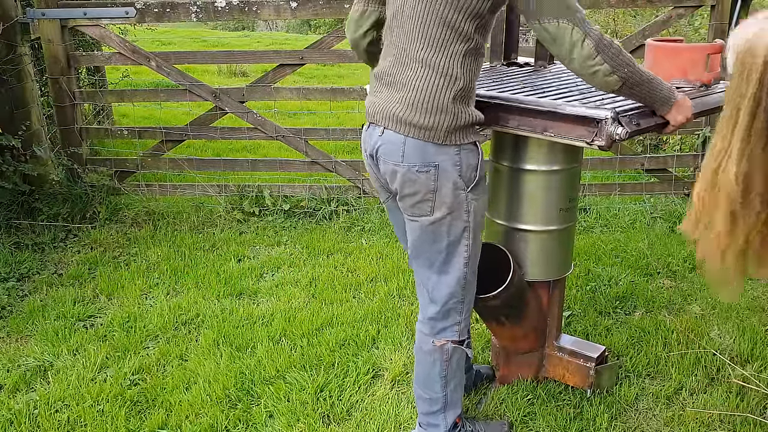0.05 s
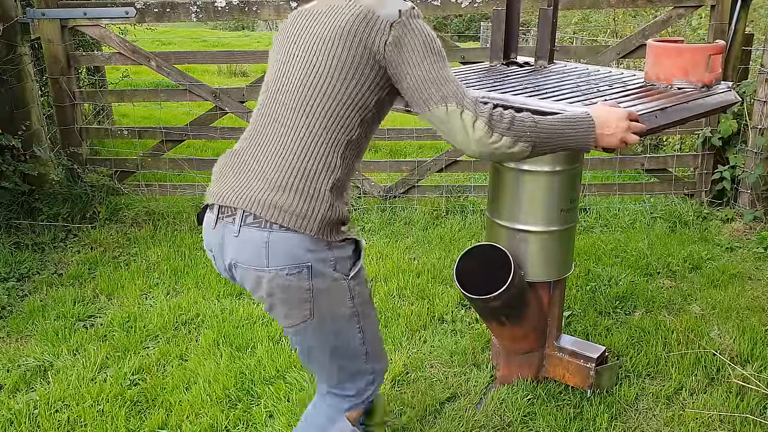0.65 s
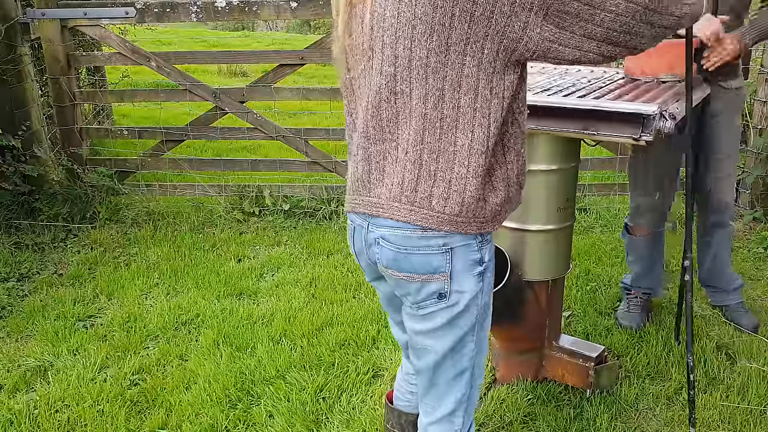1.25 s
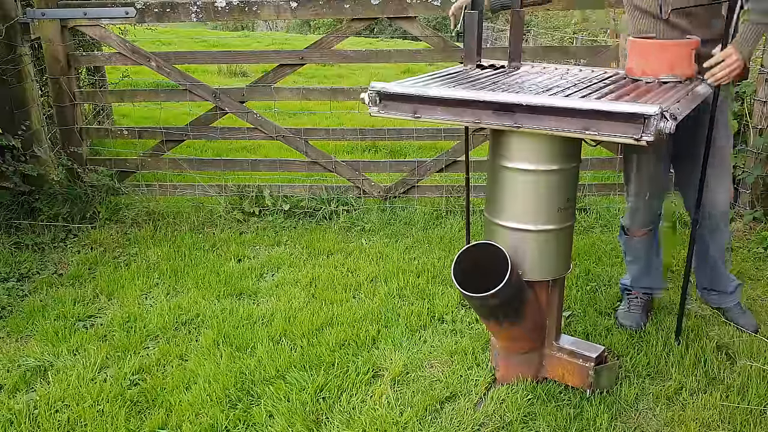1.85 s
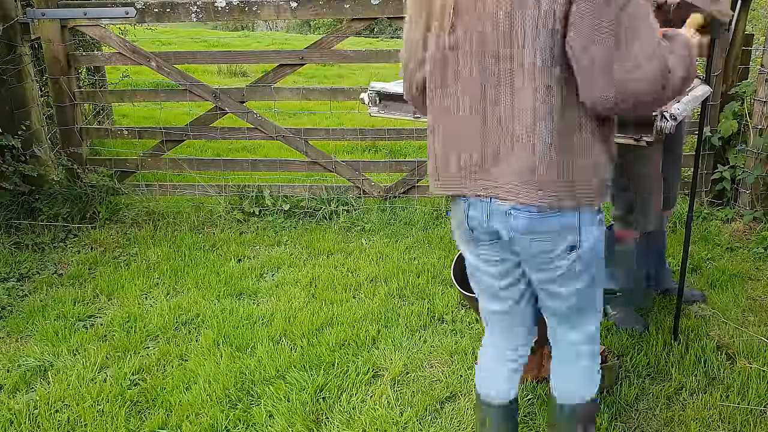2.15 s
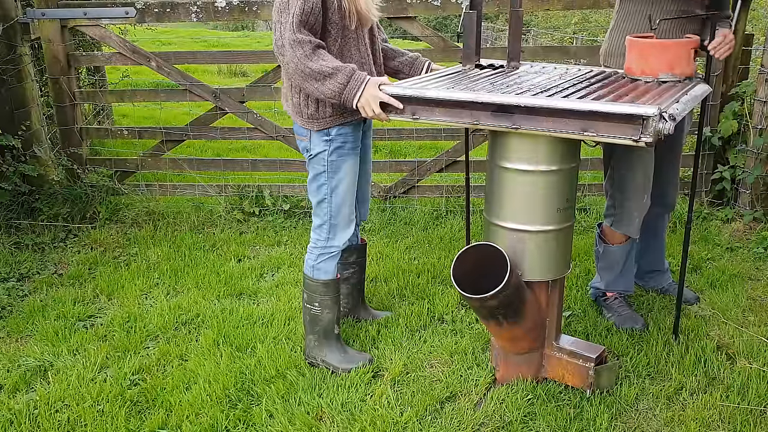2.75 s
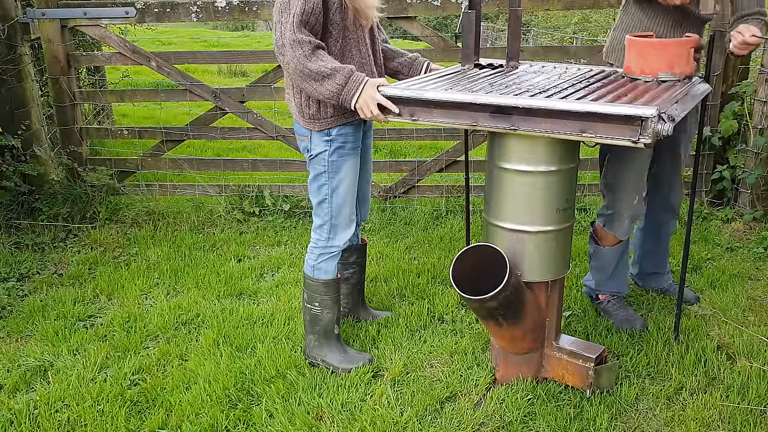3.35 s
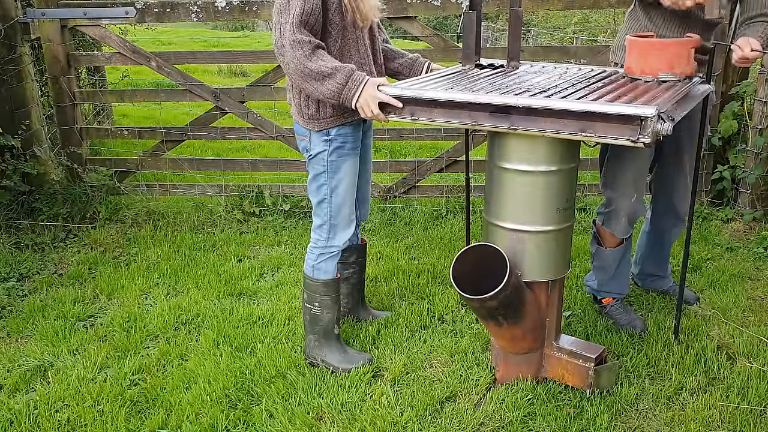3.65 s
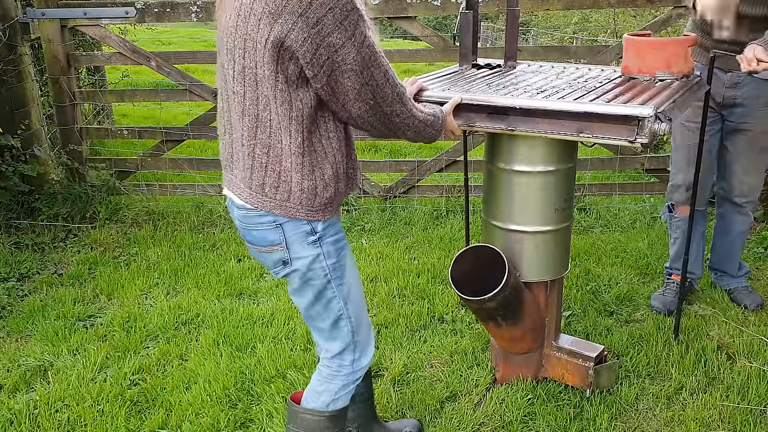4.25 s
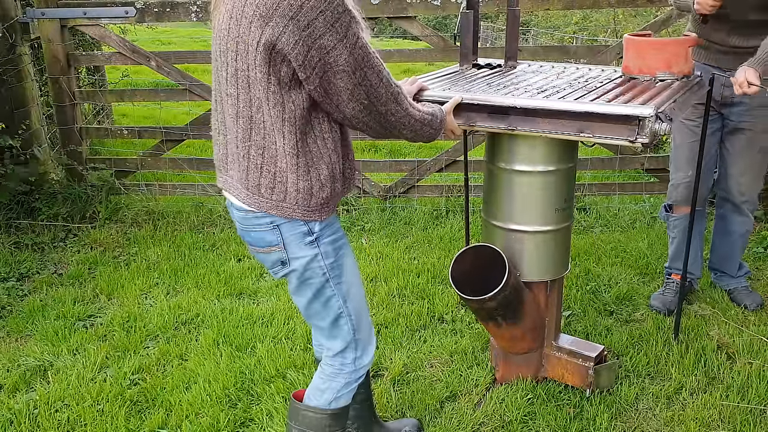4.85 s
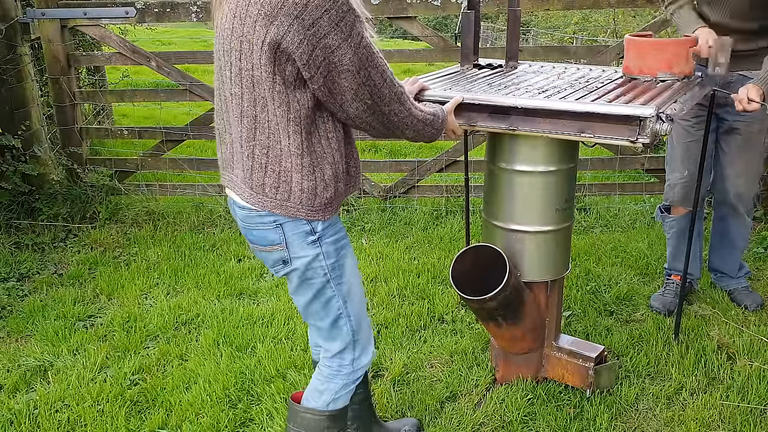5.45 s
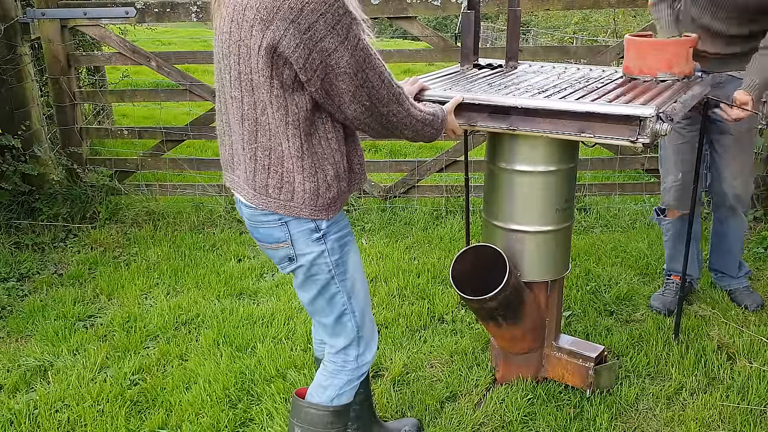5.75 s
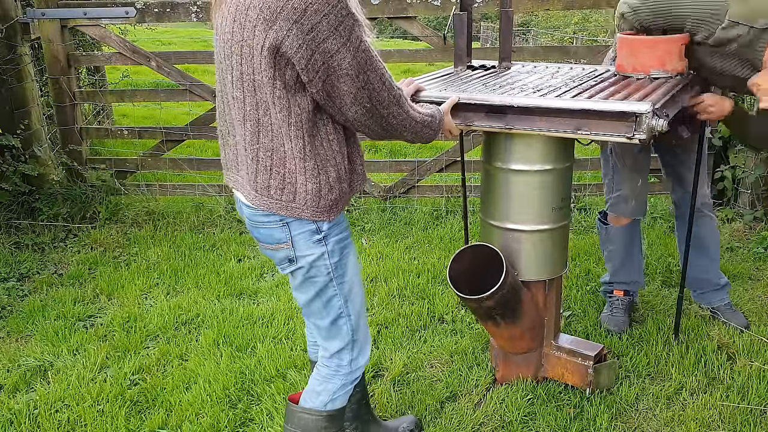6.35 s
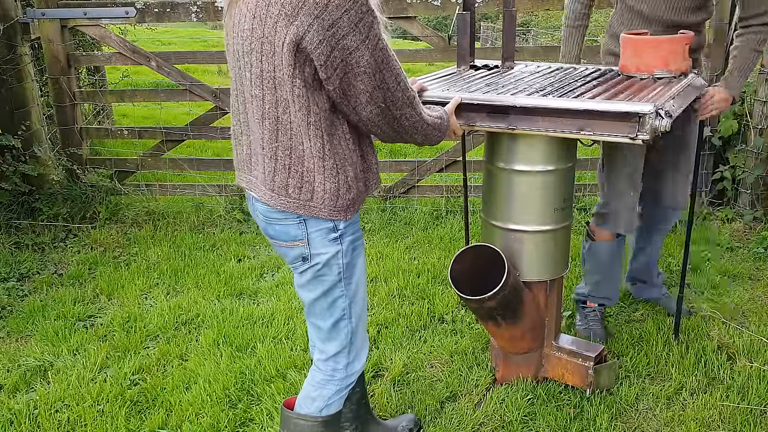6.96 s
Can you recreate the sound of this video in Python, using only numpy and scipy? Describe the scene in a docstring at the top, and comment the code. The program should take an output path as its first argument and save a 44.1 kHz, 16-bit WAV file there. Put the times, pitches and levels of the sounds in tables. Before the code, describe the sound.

A mallet taps a steel rod in fast, sped-up bursts close by, among light metal knocks and quiet outdoor air.

```python
"""On a lawn, two people fit a heavy steel griddle top and its rod onto the flue pipe of a stove.
Close by, left of the microphone, come four runs of quick, dry, sped-up mallet blows on the steel rod,
about twenty a second, each with a soft low thump; light taps and dull knocks fall around them.
Behind lie outdoor hiss, a low rumble and a faint hum, with dips where the recorder's gain ducks."""
import sys
import numpy as np
from scipy import signal
from scipy.fft import rfft, irfft
from scipy.io import wavfile

SR = 44100
rng = np.random.default_rng(int(sys.argv[2]) if len(sys.argv) > 2 else 0)


def unload_wav(signal):
    """Save mono or channel-first audio to the path in sys.argv[1] as 16-bit WAV at rate SR, clipped to [-1, 1]."""
    wavfile.write(
        sys.argv[1],
        SR,
        np.round(np.clip(np.atleast_2d(signal).T, -1, 1) * 32767).astype(np.int16),
    )


N = 312669
TIME = np.arange(N) / SR


def undb(db):
    """Decibels to gain."""
    return 10 ** (np.asarray(db) / 20)


def unit(x):
    """Scale to rms 1."""
    return x / np.sqrt(np.mean(x ** 2) + 1e-30)


def curve(table, column):
    """One column of a table, joined by straight lines in time."""
    rows = np.array(table)
    return np.interp(TIME, rows[:, 0], rows[:, column])


def colour(points, hz):
    """Gain of a spectrum of (Hz, dB) points."""
    point_hz, db = np.transpose(points)
    return undb(np.interp(np.log(hz + 1), np.log(point_hz), db))


def band(hz, lo, hi, order=8):
    """Gain of a steep band-pass."""
    return 1 / np.sqrt((1 + (lo / (hz + 1)) ** (2 * order)) * (1 + (hz / hi) ** (2 * order)))


def resonance(hz, centre_hz, width_hz):
    """Response of one damped mode, gain 1 at its centre."""
    return 1j * hz * width_hz / (centre_hz ** 2 - hz ** 2 + 1j * hz * width_hz)


def pan(db):
    """Constant-power gains for a left minus right level in dB."""
    gains = undb(np.array([db, -db]).reshape(2, -1) / 2)
    return gains / np.sqrt(np.mean(gains ** 2, axis=0))


def stereo_noise(size, apart):
    """Noise that both sides share, plus a part of their own."""
    noise = rng.standard_normal((3, size))
    return (noise[0] + apart * noise[1:]) / np.sqrt(1 + apart ** 2)


def drift(rate_hz):
    """A random wander at rms 1."""
    knots = rng.standard_normal(1024)
    return unit(np.interp(TIME * rate_hz, np.arange(len(knots)), knots))


def add(out, start_s, sound):
    """Mix a sound in at a given time."""
    i = int(round(start_s * SR))
    out[:, i:i + sound.shape[1]] += sound[:, :N - i]


# The background, with dips written in where the recorder's gain control turns it down after loud ticks.
# Each row: time in seconds, then levels of hiss, rush and rumble in dB.
BACKGROUND_LEVELS = [(0, -59, -58, -49), (0.12, -58.5, -58.5, -54.5), (0.28, -59.5, -57, -52),
                     (0.45, -56.5, -54.5, -54.5), (0.62, -58, -56.5, -51), (0.78, -58.5, -56, -50),
                     (0.98, -57, -55.5, -45.5), (1.06, -64, -59.5, -55.5), (1.25, -61, -58.5, -55),
                     (1.33, -62, -58.5, -48), (1.55, -64.0, -57.5, -49), (1.72, -59.5, -54.5, -47.5),
                     (1.9, -59, -54.5, -48), (2.05, -58, -57, -52.5), (2.22, -60.5, -57.5, -51),
                     (2.42, -58.5, -53.5, -50), (2.56, -55.5, -50.5, -49), (2.69, -59.5, -65, -50.5),
                     (2.79, -51.5, -51.5, -57), (2.85, -67, -61, -59), (2.91, -65, -64.5, -54),
                     (3.0, -60.5, -54.5, -53), (3.1, -58.5, -54, -47.5), (3.23, -60, -53.5, -54),
                     (3.37, -63, -60.5, -54), (3.47, -53, -56, -54), (3.56, -64, -59, -60),
                     (3.66, -65, -56.5, -49.5), (3.79, -64, -63.5, -53), (3.9, -57.5, -57.5, -53.5),
                     (4.05, -57.5, -57.5, -55.5), (4.2, -61.5, -58, -54.5), (4.38, -63.5, -59.5, -55),
                     (4.53, -65.5, -60, -51.5), (4.68, -62, -61.5, -61), (4.82, -61.5, -60.5, -53),
                     (4.92, -61, -51.5, -39), (5.02, -58.5, -54.5, -46.5), (5.12, -66.5, -61.5, -54.5),
                     (5.28, -65.5, -61, -53.5), (5.42, -68, -66, -61), (5.55, -69, -60, -54),
                     (5.7, -66.5, -66.5, -55.5), (5.79, -68.5, -66, -60), (5.87, -63.5, -61, -57),
                     (5.95, -59, -53, -55), (6.08, -55.5, -50, -51), (6.2, -59.5, -52.5, -50.5),
                     (6.35, -55, -48, -47.5), (6.48, -56, -49, -54), (6.58, -60, -55, -55),
                     (6.8, -58.5, -55, -54.5), (6.97, -59.5, -54.5, -52.5), (7.07, -64, -57, -55)]
# Its colour at the microphone. Each row: frequency in Hz, relative level in dB.
BACKGROUND_COLOUR = [(20, 0), (35, -2), (52, 0.5), (75, -4), (105, -3), (135, -10), (170, -11),
                     (280, -13.5), (600, -20), (1500, -22.5), (3000, -26.5), (5600, -29), (6800, -38),
                     (8000, -49.5), (9200, -59.5), (10200, -76.5)]
# Its lean to the left. Each row: time in seconds, left minus right in dB.
BACKGROUND_PAN = [(0, 6), (1.2, 11), (2, 7), (3.5, 5.5), (5, 5), (6.2, 5.5), (7.09, 6)]


def background(trim_db=-1.0, flicker_db=0.8):
    """Outdoor hiss, a low rush and a rumble of air, each following its level curve."""
    hz = np.arange(N // 2 + 1) * SR / N

    def layer(lo, hi, apart, level_db, flicker_hz):
        """One band of noise, flickering about its level."""
        spectrum = rfft(stereo_noise(N, apart)) * colour(BACKGROUND_COLOUR, hz) * band(hz, lo, hi)
        return unit(irfft(spectrum, N)) * undb(level_db + flicker_db * drift(flicker_hz))

    hiss = layer(1300, 11000, apart=0.71, level_db=curve(BACKGROUND_LEVELS, 1) + trim_db, flicker_hz=25)
    rush = layer(150, 1300, apart=0.93, level_db=curve(BACKGROUND_LEVELS, 2) + trim_db, flicker_hz=18)
    rumble = layer(15, 140, apart=0.99, level_db=curve(BACKGROUND_LEVELS, 3), flicker_hz=16)
    return (hiss + rush + rumble) * pan(curve(BACKGROUND_PAN, 1))


# A hum in the background. Each row: pitch in Hz, base level in dB.
HUM_TONES = [(100, -60), (150, -67.5), (350, -76.5), (500, -70.5), (700, -71.5), (1200, -77)]
# Its level dips and returns. Each row: time in seconds, gain in dB.
HUM_GAIN = [(0, 2), (1, -0.5), (1.1, -3), (1.8, -1), (2.4, -5), (2.9, -11), (4, -5), (5.7, -12.5),
            (6.1, -0.5), (7.09, 0)]


def hum(waver_db=0.1, waver_radians=0.59, pan_db=7):
    """Faint tones off to the left, each wavering a little in level and pitch."""
    tones = np.zeros(N)
    for hz, db in HUM_TONES:
        amplitude = np.sqrt(2) * undb(db - waver_db * drift(2.6))
        tones += amplitude * np.sin(2 * np.pi * hz * TIME + waver_radians * drift(4.1))
    return tones * undb(curve(HUM_GAIN, 1)) * pan(pan_db)


# The short metallic resonances of each tick. Each row: pitch in Hz, width in Hz, relative level in dB.
TICK_MODES = [(330, 130, -10.5), (670, 317, -8), (1130, 380, -7.5), (1670, 200, -8), (2310, 494, -4),
              (3000, 306, 1.5), (3500, 443, -1.5), (4470, 725, -1), (5190, 986, 1), (6900, 1255, -0.5)]
# The loss of treble in a tick. Each row: frequency in Hz, gain in dB.
TICK_ROLLOFF = [(5500, -2), (7300, -8), (8000, -10), (9000, -9.5), (9800, -22), (10800, -52)]
# The body, middle and edge of a tick. Each row: low limit in Hz, high limit in Hz.
TICK_BANDS = [(200, 1500), (1500, 4200), (4200, 10500)]
# Sharp dry strikes and light taps, close to the microphone. Each row: time in seconds, levels of body,
# middle and edge in dB (rms over 10 ms), length in seconds, near scatter in dB, left minus right in dB,
# ping pitch in Hz, ping gain in dB.
TICKS = [(1.0386, -60, -58, -62.5, 0.00081, -12, 1, 4720, 8),
         (1.103, -58.5, -56.5, -64.5, 0.0019, -21, 14, 2020, 8),
         (1.683, -58, -59.5, -65, 0.0011, -15, 5, 2000, 6),
         (1.8257, -47, -53, -45.5, 0.0013, -11, 1, 2140, 18),
         (2.351, -43.5, -46.5, -69, 0.003, -6, 6, 2020, 4.5),
         (2.5068, -35.5, -41.5, -55.5, 0.0015, -2, 9.5, 2220, 10),
         (2.6154, -25.5, -16.5, -30.5, 0.0013, -24, 6.5, 2480, 7),
         (2.6639, -33, -26, -29.5, 0.00071, -24, 6.5, 3880, -1),
         (2.7131, -36.5, -27.5, -28.5, 0.0025, -32, 7.5, 5330, 5),
         (2.7616, -39.5, -29, -35.5, 0.00093, -13, 7, 3200, -8),
         (2.8135, -34, -25.5, -29.5, 0.0015, -23, 6, 3620, 0),
         (2.8677, -40, -31.5, -34, 0.0028, -13, 8, 5060, 7),
         (3.1654, -41, -35.5, -27.5, 0.0025, -19, 9, 5400, 7.5),
         (3.211, -41.5, -31.5, -28.5, 0.0013, -32, 6.5, 4900, 9),
         (3.2556, -37.5, -27.5, -27, 0.0014, -31, 5, 5400, 7.5),
         (3.3019, -38, -33, -28, 0.00084, -19, 5, 5250, 5),
         (3.3472, -41, -32, -33.5, 0.0036, -26, 5, 5250, 7),
         (3.3961, -36.5, -34, -32.5, 0.00099, -17, 3, 1990, 10.5),
         (3.444, -39.5, -36, -32.5, 0.0009, -13.5, 4.5, 5170, 2),
         (3.489, -44, -35, -32, 0.0035, -31, 3.5, 4950, 6),
         (3.5394, -42, -35.5, -32.5, 0.00061, -20, 2, 3830, -2),
         (3.5886, -37.5, -28.5, -27.5, 0.0014, -22, 4.5, 3320, -1.5),
         (3.6376, -43.5, -30.5, -33, 0.0013, -21, 1.5, 3720, 2.5),
         (3.6879, -43.5, -34.5, -29.5, 0.0027, -21, 7, 5670, 7),
         (3.7368, -41.5, -32, -32.5, 0.00077, -14, 3.5, 3960, 7),
         (4.1279, -46.5, -35, -28.5, 0.0025, -29, 6, 4610, 8),
         (4.1737, -45.5, -35.5, -31, 0.001, -26, 1.5, 4300, 7),
         (4.2193, -48.5, -36.5, -33.5, 0.001, -25, 1.5, 6120, 4),
         (4.2666, -51, -36.5, -35, 0.0011, -21, 3, 4440, 7),
         (4.312, -51, -35, -32, 0.0011, -21.5, 1.5, 3760, 10.5),
         (4.359, -44, -36, -34.5, 0.00084, -25, 1.5, 4630, 5),
         (4.4061, -49, -40, -34.5, 0.0027, -18, 1.5, 5030, 9),
         (4.454, -46.5, -37, -30.5, 0.00078, -20, 4, 5040, 2.5),
         (4.504, -48, -38, -34, 0.00099, -19.5, 3.5, 6330, 3),
         (4.5515, -45, -35, -32.5, 0.0011, -27, 3.5, 3600, 5),
         (4.6007, -50, -36.5, -33, 0.001, -25, 1, 5730, 3),
         (4.6507, -49.5, -36, -35, 0.0017, -33, 2, 2840, 10),
         (4.6982, -49.5, -37, -36.5, 0.0011, -21, 2, 2960, 8),
         (4.7465, -45.5, -42, -34, 0.0043, -3.5, 2.5, 5170, 1),
         (4.7967, -60, -48, -44.5, 0.00072, -33, 2.5, 2820, 0),
         (4.8431, -54.5, -40, -39, 0.0011, -21, 2, 5430, 4),
         (4.8929, -38, -32.5, -38, 0.0017, -20, 4, 5530, 11),
         (4.9448, -47.5, -38.5, -36.5, 0.0012, -27, 3.5, 6660, 4),
         (4.9935, -46.5, -37, -38.5, 0.0015, -32, 4.5, 3830, 6.5),
         (5.0444, -50.5, -40.5, -35, 0.00056, -18, 4.5, 6200, 3),
         (5.0965, -51.5, -40.5, -39.5, 0.0011, -34, 3, 6330, 6),
         (5.1465, -43, -39.5, -39, 0.001, -14.5, 1, 3050, 4),
         (5.199, -53, -41, -37, 0.00092, -30, 3, 6200, 6),
         (5.2491, -45.5, -41.5, -38, 0.0013, -23, 1.5, 6330, -1.5),
         (5.3014, -53.5, -42.5, -38, 0.0007, -23, 2, 6240, 5),
         (5.3534, -47.5, -44.5, -37.5, 0.0017, -12, 4, 6800, 4.5),
         (5.4713, -51, -38.5, -36, 0.00074, -35, 5, 4220, 4.5),
         (5.5238, -50, -38.5, -33, 0.00082, -23, 3.5, 2260, 11),
         (5.5746, -49.5, -38.5, -32.5, 0.00092, -22, 3, 3870, 8.5),
         (5.6268, -50, -45, -35.5, 0.001, -14.5, 3.5, 6460, 4.5),
         (5.6866, -51.5, -44.5, -37, 0.00097, -13.5, 2.5, 4780, 1.5),
         (5.7385, -53, -42.5, -39.5, 0.00097, -21, 3, 6160, 6.5),
         (5.9044, -47.5, -42.5, -53.5, 0.0016, -19, 1.5, 3060, 0.5),
         (6.05, -50.5, -49.5, -57, 0.001, -16, 2, 4600, 8),
         (6.2523, -36.5, -34, -49.5, 0.0026, -11, 2.5, 3620, 3),
         (6.2911, -43, -42, -58, 0.0016, -4, 9, 5430, 14),
         (6.3193, -43.5, -46.5, -62, 0.0015, -10, 6, 2000, 11),
         (6.4437, -55, -51.5, -79, 0.0015, -11, 11, 2000, 23)]


def ticks(snap_s=0.0007, skirt_db=-27, skirt_s=0.0031, evenness=0.57,
          near_s=0.0051, yard_s=0.014, yard_hz=1500, size=8192):
    """Sped-up mallet blows briefly ring the steel rod; ground and fence scatter a faint tail."""
    lead = size // 8
    t = (np.arange(size) - lead) / SR
    hz = np.arange(size // 2 + 1) * SR / size
    modes = sum((-1) ** k * undb(db) * resonance(hz, pitch_hz, width_hz)
                for k, (pitch_hz, width_hz, db) in enumerate(TICK_MODES))
    steel = modes * colour(TICK_ROLLOFF, hz)
    to_10_ms = np.sqrt(0.01 * SR / size)
    scatter_onset = np.clip(t / 0.0064, 0, 1)
    out = np.zeros((2, N))
    for time_s, *band_dbs, length_s, near_db, pan_db, ping_hz, ping_db in TICKS:
        rise_s = min(0.56 * length_s, 0.0009)
        fade_s = np.where(t < 0, rise_s, 0.82 * length_s)
        envelope = np.exp(-abs(t) / fade_s) + undb(skirt_db) * np.exp(-abs(t) / skirt_s)
        burst = unit(envelope * stereo_noise(size, apart=0.31))
        # the shorter the strike, the more of its force lies in one snap
        snap = snap_s / length_s * unit(1. * (t == 0))
        strike = rfft(burst + snap)
        # one strike feeds all pitches nearly alike, and only while it lasts
        flattened = irfft(strike / (abs(strike) + 1e-9) ** evenness)
        force = unit(flattened * np.tanh(20 * envelope))
        # a short bright scatter from close by, a longer dull one from the yard
        near = unit(scatter_onset * np.exp(-abs(t) / near_s) * stereo_noise(size, apart=0.33))
        yard = unit(scatter_onset * np.exp(-abs(t) / yard_s) * stereo_noise(size, apart=0.35))
        scatter = undb(near_db) * rfft(near) + undb(-17) * rfft(yard) / (1 + 1j * hz / yard_hz)
        # each tick has its own ping and its own balance of bands
        ping = 1 + (undb(ping_db) - 1) * resonance(hz, ping_hz, width_hz=700)
        ring = (rfft(force) + scatter) * steel * ping
        tick = sum(undb(db) * unit(irfft(ring * band(hz, lo, hi)))
                   for db, (lo, hi) in zip(band_dbs, TICK_BANDS))
        add(out, time_s - lead / SR, to_10_ms * tick * pan(pan_db))
    return out


def thumps(below_edge_db=11, typical_hz=125, decay_s=0.008, size=2048):
    """A soft low thump of a cycle or so under each tick."""
    t = np.arange(size) / SR
    envelope = np.exp(-t / decay_s) * np.tanh(t / 0.0012)
    out = np.zeros((2, N))
    for time_s, _, _, edge_db, _, _, pan_db, _, _ in TICKS:
        pitch_hz = typical_hz * np.exp(0.28 * rng.standard_normal())
        thump = envelope * np.sin(2 * np.pi * pitch_hz * t)
        add(out, time_s, undb(edge_db - below_edge_db) * thump * pan(pan_db))
    return out


# The notes of the dull knocks at the stove, left of the microphone. Each row: start in seconds,
# level in dB, pitch in Hz, length of the push in seconds, time to fade by 60 dB in seconds.
KNOCK_NOTES = [(1.824, -36, 1536, .001, 0.056), (1.826, -22, 350, 0.0037, 0.022),
               (1.8431, -26.5, 1230, .003, 0.0087), (1.8439, -23, 975, 0.0061, 0.012),
               (1.845, -35, 173, .004, 0.043), (1.8454, -31, 473, 0.002, 0.051),
               (1.846, -40, 2520, 0.0011, 0.043), (2.615, -28, 550, 0.0013, 0.033),
               (2.618, -38.5, 1048, .002, 0.22), (2.867, -26, 1027, 0.0027, 0.032),
               (4.894, -29, 600, 0.0013, 0.016), (4.894, -26.5, 154, 0.0021, 0.043),
               (6.251, -29, 3500, .002, 0.029), (6.2525, -28, 1837, 0.0023, 0.027),
               (6.319, -32, 278, 0.0014, 0.026)]


def knocks(roughness=0.33, pan_db=5.5, size=8192):
    """The heavy parts meet: a soft push swells a damped mode, and loose contact roughens its ring."""
    t = np.arange(size) / SR
    hz = np.arange(size // 2 + 1) * SR / size
    out = np.zeros((2, N))
    for start_s, db, pitch_hz, push_s, t60 in KNOCK_NOTES:
        swell = np.sin(np.pi / 2 * np.clip(t / push_s, 0, 1)) ** 2
        fade = np.exp(-np.log(1000) * np.maximum(t - push_s, 0) / t60)
        ring = fade * np.sin(2 * np.pi * pitch_hz * t)
        around_pitch = band(hz, pitch_hz / 2, pitch_hz * 1.3, order=10)
        noise = unit(irfft(rfft(stereo_noise(size, apart=0.59)) * around_pitch))
        chatter = roughness * fade ** 0.42 * noise
        add(out, start_s, undb(db) * swell * (ring + chatter) * pan(pan_db))
    return out


def scene():
    """From beside the stove: ticks, thumps and knocks in front, outdoor noise and hum behind."""
    return ticks() + thumps() + knocks() + background() + hum()


def record(dry, overload=0.7, top_hz=15400):
    """The microphone clips any crack that overloads it; the highest treble is cut."""
    clipped = np.clip(dry, -overload, overload)
    low_pass = signal.ellip(8, 0.2, 70, top_hz, fs=SR, output="sos")
    return signal.sosfilt(low_pass, clipped)


dry = scene()
out = record(dry)
unload_wav(out)
```